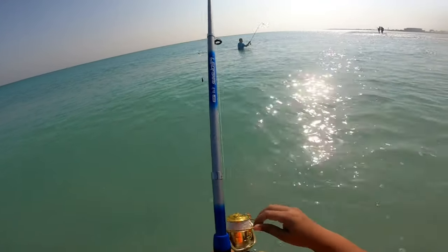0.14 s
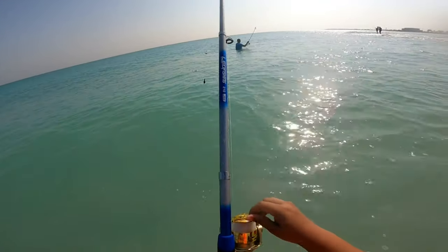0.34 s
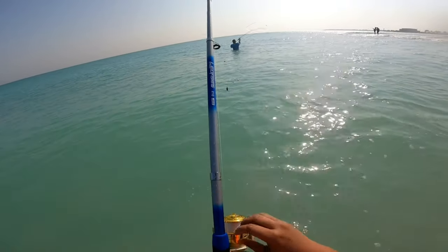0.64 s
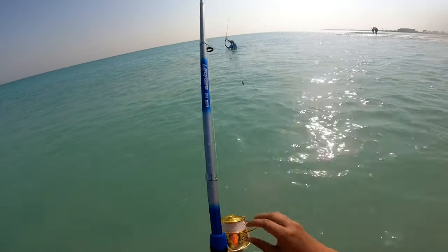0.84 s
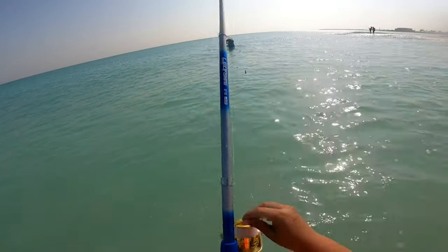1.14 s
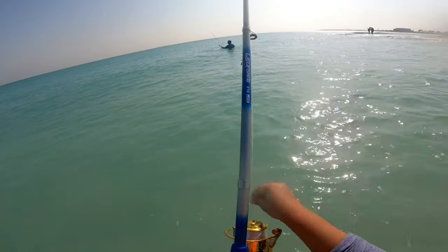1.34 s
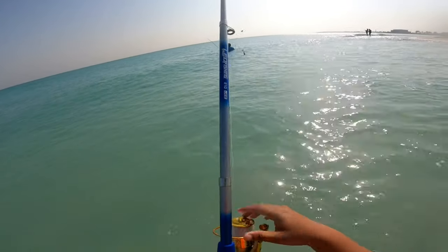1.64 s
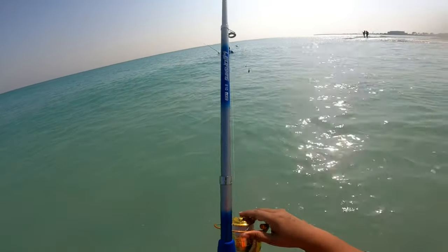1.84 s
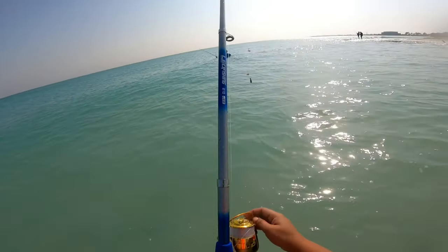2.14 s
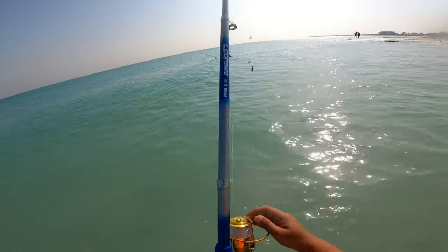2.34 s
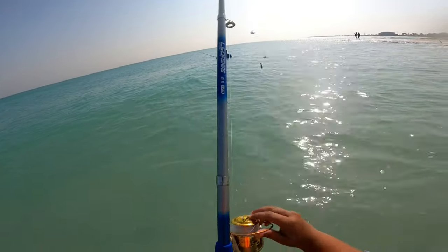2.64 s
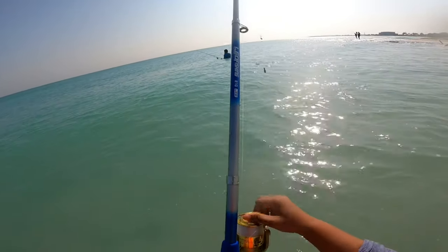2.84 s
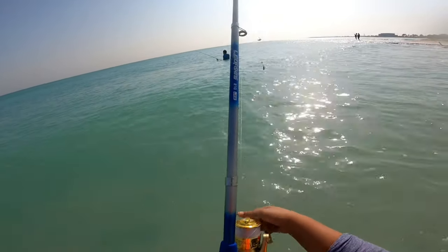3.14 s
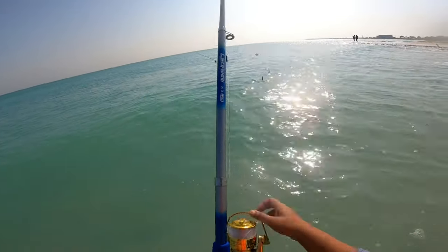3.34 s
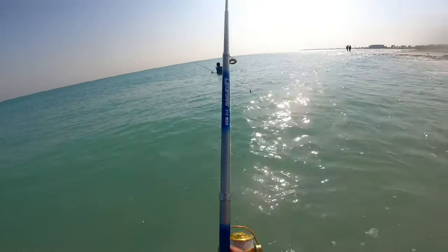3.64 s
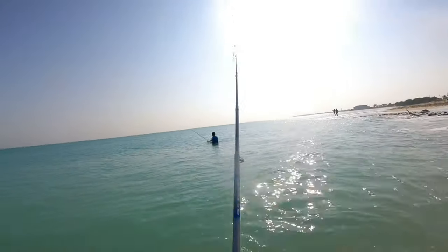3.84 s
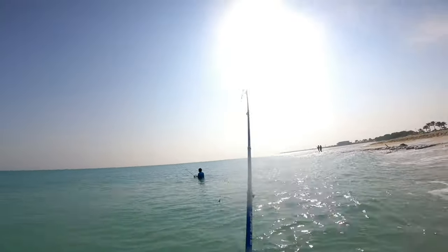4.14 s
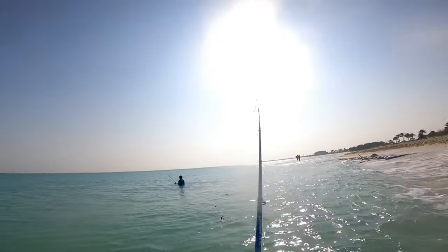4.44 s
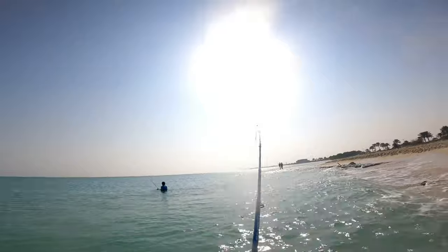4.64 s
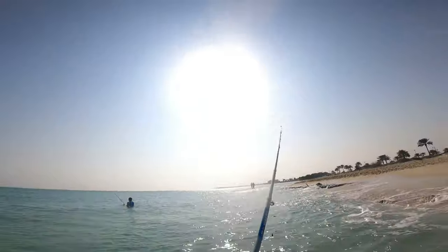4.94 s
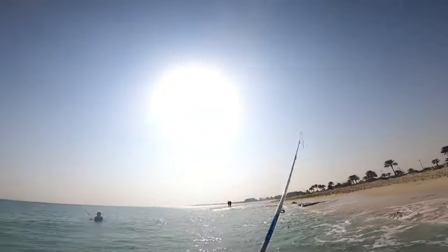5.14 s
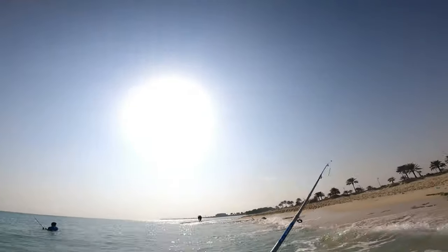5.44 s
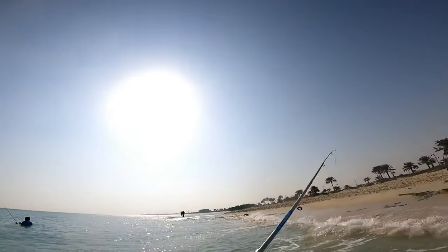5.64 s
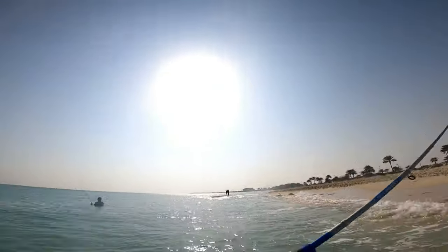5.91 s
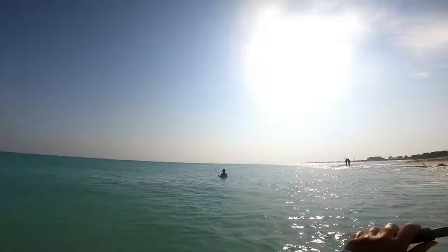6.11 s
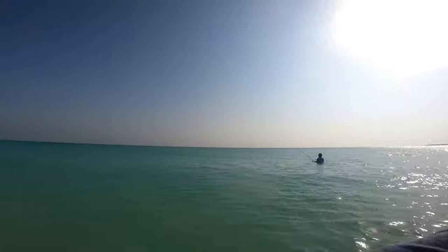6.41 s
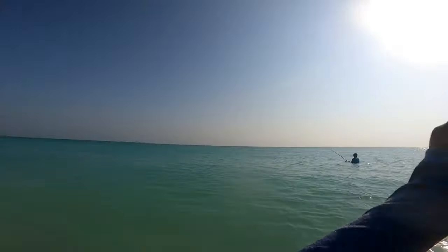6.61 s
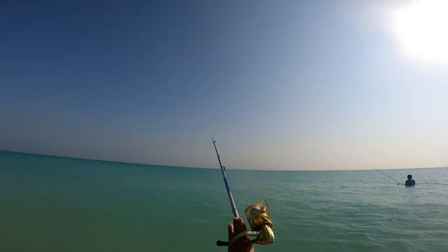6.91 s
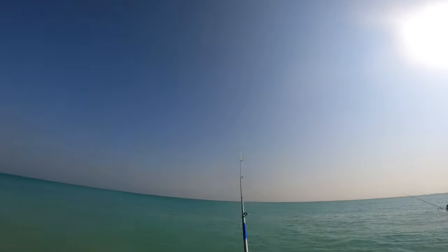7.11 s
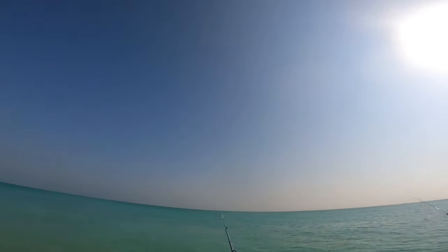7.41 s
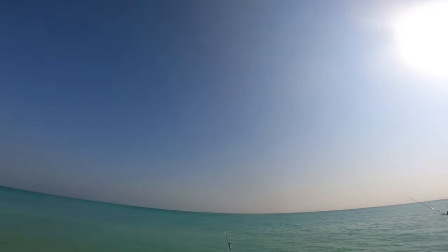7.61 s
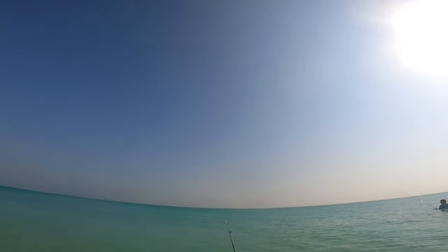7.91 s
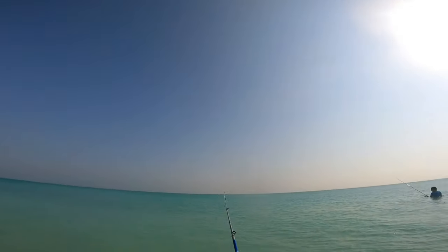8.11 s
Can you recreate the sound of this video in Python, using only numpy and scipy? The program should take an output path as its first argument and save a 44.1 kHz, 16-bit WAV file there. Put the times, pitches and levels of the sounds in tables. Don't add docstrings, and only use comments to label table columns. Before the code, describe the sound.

Close fishing reel clicks and one sharp metallic bail snap over lapping, bubbling surf and low wind rumble, then a rapid flutter of line ticks.

```python
import sys
import numpy as np
from scipy import signal
from scipy.fft import rfft, irfft, next_fast_len
from scipy.io import wavfile

SR = 44100
rng = np.random.default_rng(int(sys.argv[2]) if len(sys.argv) > 2 else 0)


def volts_from_decibels(level):
    exponent = np.asarray(level, float) / 20
    return 10 ** exponent


def wrap_up_sound(samples):
    columns = np.atleast_2d(samples).T
    tamed = np.clip(columns, -1, 1)
    steps = np.round(tamed * 32767).astype(np.int16)
    wavfile.write(sys.argv[1], SR, steps)


N = 364707


def rms_one(x):
    return x / np.sqrt(np.mean(x ** 2) + 1e-20)


def butter(x, order, hz, kind="low"):
    return signal.sosfilt(signal.butter(order, hz, kind, fs=SR, output="sos"), x)


def in_time(rows, silent=None):
    s, *columns = np.transpose(rows)
    return [np.interp(np.arange(N) / SR, s, c, silent, silent) for c in columns]


def at_hz(points, hz, outside=None):
    table = np.array(points)
    return np.interp(np.log(hz), np.log(table[:, 0]), table[:, 1], outside, outside)


def swells(rows, rise_s, fall_s):
    t = np.arange(N) / SR
    power = 0
    for s, db in rows:
        power = power + volts_from_decibels(2 * db) * np.exp(-((t - s) / np.where(t < s, rise_s, fall_s)) ** 2)
    return np.sqrt(power)


def strokes(starts, lengths, levels_db, edge):
    t = np.arange(N) / SR
    gain = 0
    for s, length, db in zip(starts, lengths, levels_db):
        outside_s = np.maximum(np.maximum(s - t, t - s - length), 0)
        gain = gain + volts_from_decibels(db - 20 * outside_s / (edge * length + 0.0093))
    return gain


def drift(rate):
    r = np.exp(-80 * np.pi * rate / SR)
    slow = signal.lfilter([1], [1, -2 * r, r * r], rng.standard_normal(N // 40 + 2002))[2000:]
    return np.interp(np.arange(N) / 40, np.arange(len(slow)), rms_one(slow))


def ring(clicks, hz, t60):
    r, w = volts_from_decibels(-60 / (t60 * SR)), 2 * np.pi * hz / SR
    return signal.lfilter([0, np.sin(w)], [1, -2 * r * np.cos(w), r * r], clicks + 1e-18)


# (frequency [Hz], side relative to mid [dB])
WIDTH = [(30, -24), (150, -24.5), (400, -17.5), (900, -16.5), (1500, -23.5), (2500, -26.5), (5000, -12),
         (9000, 5)]


def turbulence(spectrum, shared_db, own_db, rate, grain_db=0.):
    size = next_fast_len(N)
    hz = np.maximum(np.arange(size // 2 + 1) * SR / size, 1)
    grains = rng.standard_normal((2, size)) * volts_from_decibels(grain_db * np.minimum(rng.exponential(1, size), 6))
    mid, side = rfft(grains) * volts_from_decibels(at_hz(spectrum, hz, -200))
    side = side * volts_from_decibels(at_hz(WIDTH, hz))
    lowest_hz, highest_hz = spectrum[0][0], spectrum[-1][0]
    octave = np.log2(hz / lowest_hz)
    out, together = 0, shared_db * drift(rate)
    for centre in np.arange(0, np.log2(highest_hz / lowest_hz) + .5, .5):
        share = np.clip(1 - 2 * np.abs(octave - centre), 0, 1)
        band = irfft(np.array([mid + side, mid - side]) * share, size)[:, :N]
        out = out + band * volts_from_decibels(together + own_db * drift(rate))
    return rms_one(out)


CALM_DB = -46

# (time [s], level [dB])
BREEZE = [(0, -27.5), (.2, -37.5), (.55, -33), (.9, -44), (1.22, -36), (1.45, -50.5), (1.92, -43.5),
          (2.6, -44), (3.3, -39), (4.5, -49), (5.0, -33.5), (5.3, -34), (5.62, -35), (5.9, -41),
          (6.95, -46), (7.17, -33), (7.45, -43.5), (8.27, -44.5)]
# (time [s], level [dB])
PUFFS = [(.0, -35), (.3, -36.5), (.53, -35), (1.15, -45.5), (1.24, -50), (2.14, -55), (2.45, -42),
         (2.7, -36), (2.92, -36.5), (3.13, -32.5), (3.42, -32), (4.0, -46), (4.98, -53), (5.15, -28.5),
         (5.32, -32.5), (5.57, -30), (5.75, -35), (6.15, -37), (6.77, -43), (7.2, -58), (7.93, -48.5)]
# (time [s], level [dB])
THUDS = [(.05, -39), (.38, -39), (2.3, -43), (2.77, -35.5), (3.9, -37), (4.33, -41), (5.13, -30),
         (5.46, -35), (5.62, -27), (5.53, -34), (5.72, -33), (4.2, -41), (4.5, -42), (6.45, -43),
         (3.3, -36), (6.9, -42), (7.96, -35.5)]
# (frequency [Hz], level per Hz [dB])
RUMBLE = [(12, -31.5), (22, 4), (32, 4.5), (45, 4.5), (72, 5.5), (100, -3), (150, -31), (240, -95)]
# (frequency [Hz], level per Hz [dB])
BUFFET = [(35, -30.5), (65, -10), (108, 5), (280, -8), (360, -21.5), (620, -120)]
# (time [s], wash level [dB], extra fizz [dB], extra tumble [dB])
SURGE = [(0, -36, -3, -1), (.35, -41.5, -1.5, 0.5), (0.851, -46, 1, 3), (1.7, -48, 2.5, -0.5),
         (2.8, -47.5, 2.5, 4.5), (3.099, -40, -1, 2), (3.43, -39, -2, 4), (3.6, -43, -2.5, 3),
         (4.3, -46.5, 2, 1), (4.9, -43.5, 0.5, 0.5), (5.3, -37.5, 2.5, 0), (5.48, -34, 1.5, -0.5),
         (5.92, -35.5, 4, 4.5), (6.3, -40.5, 1, 1.5), (6.6, -46.5, -1, 0), (6.95, -45.5, -0.5, 1),
         (7.3, -42, 0, -5), (8.27, -47, -2, 4)]


def breeze():
    gust_db, = in_time(BREEZE)
    lead_s = 0.16
    ahead_db = in_time([(s - lead_s, db) for s, db, *rest in SURGE])[0] - CALM_DB
    swell_db = -51.5 + 1.16 * ahead_db
    puffs = swells(PUFFS, rise_s=.049, fall_s=.047)
    boom = np.sqrt(volts_from_decibels(2 * (gust_db - 3.5)) + volts_from_decibels(2 * swell_db) + puffs ** 2)
    press = np.hypot(volts_from_decibels(gust_db), swells(THUDS, rise_s=.035, fall_s=.035))
    rumble = press * turbulence(RUMBLE, shared_db=-1.0, own_db=1.0, rate=10.0)
    return rumble + boom * turbulence(BUFFET, shared_db=1.5, own_db=1.5, rate=23.0)


def bubbles(per_s, cycles):
    sizes = volts_from_decibels(6.2 * np.minimum(rng.exponential(1, N), 3.8)) * rng.choice([-1, 1], N)
    born = rng.random(N) < per_s / SR
    pitches, dealt = np.geomspace(330, 1950, 18), rng.integers(0, 18, N)
    out = 0
    for k, hz in enumerate(pitches):
        out = out + ring(sizes * born * (dealt == k), hz, cycles / hz) * (300 / hz)
    return rms_one(out)


# (time [s], lift [dB])
CRESTS = [(2.33, 2), (2.95, 0), (4.5, 1), (5.0, 0.5), (5.4, 1.5), (5.64, 0), (5.92, 2.5), (2.55, 0.5),
          (6.55, 0.5), (.6, -1), (3.95, -0.5), (6.151, -1), (6.85, 1.5), (7.65, 1)]
# (time [s], level [dB])
SLUMPS = [(.1, -50), (.92, -46), (2.37, -39.5), (3.3, -36.5), (3.43, -36), (3.69, -38), (5.02, -56),
          (5.56, -31.5), (5.64, -25.5), (5.78, -26.5), (5.89, -29), (6.05, -44), (6.15, -35), (6.28, -46),
          (6.75, -41.5), (7.25, -45), (7.97, -40)]
# (frequency [Hz], level per Hz [dB])
TUMBLE = [(100, -7.5), (170, 2.5), (354, 1.5), (456, -3), (520, -4), (750, -12.5), (980, -28.5),
          (1650, -120)]
# (frequency [Hz], level per Hz [dB])
WASH = [(280, -27), (480, -7), (518, -5), (759, -4.5), (870, -3.5), (1220, -5.5), (1440, -15.5),
        (1600, -12), (2080, -34), (3520, -120)]
# (frequency [Hz], level per Hz [dB])
FOAM = [(900, -30.5), (1300, 0.5), (1440, -4.5), (1750, 1.5), (2360, -2), (2640, -6), (2870, -4.5),
        (3400, -10.5), (4200, -37), (5500, -68.5)]
# (frequency [Hz], level per Hz [dB])
SPRAY = [(2600, -29.5), (3500, -2), (3900, -1), (4400, -1), (5400, -11.5), (6500, -17.5), (7500, -25.5),
         (9000, -37.5), (11000, -54)]


def sea():
    t = np.arange(N) / SR
    wash_db, froth_db, weight_db = in_time(SURGE)
    for s, lift_db in CRESTS:
        wash_db = wash_db + lift_db * np.exp(-((t - s) / 0.058) ** 2)
    vigour_db = wash_db - CALM_DB
    tumble_db = -43.5 + 0.9 * vigour_db + weight_db
    foam_db = -55.5 + 1.227 * vigour_db + 0.74 * froth_db
    spray_db = -70 + 1.196 * vigour_db + froth_db
    lumps = np.hypot(volts_from_decibels(tumble_db), swells(SLUMPS, rise_s=.03, fall_s=.053))
    tumble = lumps * turbulence(TUMBLE, shared_db=.5, own_db=2.0, rate=15.0)
    wash = volts_from_decibels(wash_db) * turbulence(WASH, shared_db=0.25, own_db=1.87, rate=24.0, grain_db=1.5)
    foam = volts_from_decibels(foam_db) * turbulence(FOAM, shared_db=0.96, own_db=-0.4, rate=48.0, grain_db=2.5)
    spray = volts_from_decibels(spray_db) * turbulence(SPRAY, shared_db=0.65, own_db=1.5, rate=29.0, grain_db=2.0)
    trapped_air = volts_from_decibels(wash_db - 4.5) * butter(bubbles(400., cycles=36.), 2, 3000)
    return tumble + wash + foam + spray + trapped_air


def ticks(table, t60, crack_db, top_hz, low_hz=2200, frame_db=-10):
    span = 2000
    out, age = np.zeros(N + span), np.arange(span) / SR
    for (s, peak_db, hz), noise in zip(table, rng.standard_normal((len(table), span))):
        frame_hz = 4300 * (1 + .04 * noise[1])
        frame = volts_from_decibels(frame_db + 3.0 * noise[0]) * np.sin(2 * np.pi * frame_hz * age)
        tone = (np.sin(2 * np.pi * hz * age) + frame) * volts_from_decibels(-60 * age / t60)
        crack = volts_from_decibels(crack_db) * noise * volts_from_decibels(-60 * age / 0.0035)
        start = round(s * SR)
        out[start:start + span] += volts_from_decibels(peak_db) * (tone + crack) * (1 - np.exp(-age / 0.00021))
    return butter(butter(out[:N], 6, top_hz), 3, low_hz, "high")


# (time [s], peak level [dB], pitch [Hz])
DRIPS = [(.1555, -50, 3070), (0.8061, -48, 4470), (2.288, -64, 6430), (2.3077, -50, 3290),
         (2.6994, -61, 6470), (2.73, -57, 7140), (3.2863, -54, 5930), (3.985, -53, 2600),
         (4.1579, -60, 3230), (4.4662, -66, 4570), (4.5481, -59, 3120), (4.7187, -65, 3010),
         (4.7541, -64, 3140), (5.3368, -56, 3030), (.216, -44, 2300), (5.26, -59, 4500), (5.635, -47, 2300),
         (5.7, -48, 3500), (5.955, -49, 2600), (6.02, -49, 4800)]


def drips():
    return ticks(DRIPS, t60=.0068, crack_db=5.8, top_hz=7500, low_hz=1500)


# (time [s], peak level [dB], pitch [Hz])
PAWL = [(1.0286, -44, 3490), (1.0385, -40, 3740), (1.0809, -37, 3450), (1.1014, -44, 4500),
        (1.1124, -46, 4070), (1.1235, -40, 2800), (1.128, -43, 4150), (1.1207, -40, 4180),
        (1.1434, -43, 4400), (1.1504, -45, 4400), (1.1584, -44, 4500), (1.1405, -43, 3200),
        (1.134, -47, 4300), (1.1865, -49, 3000), (1.2005, -47, 3100), (1.172, -36, 2900),
        (1.1745, -43, 4300), (1.211, -46, 2900), (1.1945, -38, 3300), (1.2166, -46, 3000),
        (1.226, -41, 3200), (1.231, -44, 3000), (1.2354, -44, 3260), (1.2521, -48, 3400),
        (1.2874, -48, 4560), (1.296, -43, 4570)]


def pawl():
    return volts_from_decibels(-3.5) * ticks(PAWL, t60=.017, crack_db=6.7, top_hz=6000)


# (start [s], length [s], body level [dB], grit level [dB])
RUB = [(1.03, 0.041, -62, -81), (1.055, 0.009, -56, -65), (1.094, 0.043, -59, -70), (1.143, 0.05, -57, -78),
       (1.205, 0.035, -61, -76), (1.254, 0.061, -60, -73.5), (7.04, 0.018, -71, -76),
       (7.14, 0.043, -70, -68), (7.222, .025, -70, -78), (7.05, 0.05, -58, -67), (7.098, 0.038, -54, -69),
       (7.194, 0.024, -53, -71), (7.24, 0.059, -63, -69), (7.334, 0.062, -59.5, -67.5),
       (7.403, .04, -62, -74), (7.473, 0.012, -53, -77), (7.558, 0.19, -77, -79), (7.76, .03, -69, -78),
       (7.85, 0.071, -79, -80), (8.046, 0.12, -75, -79)]
# (frequency [Hz], level per Hz [dB])
RUB_COLOUR = [(1800, -37), (2400, 4), (2800, -6), (3180, 4), (3600, -9.5), (4290, -5.5), (5000, -13),
              (6200, -37), (7500, -61)]
# (frequency [Hz], level per Hz [dB])
GRIT_COLOUR = [(4000, -33), (5500, -4.5), (7000, -9), (8500, -12), (9500, -16), (11000, -63)]


def rubbing():
    starts, lengths, body_db, grit_db = np.transpose(RUB)
    body = turbulence(RUB_COLOUR, shared_db=2.0, own_db=2.5, rate=29.0, grain_db=2.5)
    grit = turbulence(GRIT_COLOUR, shared_db=-3.0, own_db=-1.0, rate=21.0, grain_db=5.5)
    return strokes(starts, lengths, body_db, .38) * body + strokes(starts, lengths, grit_db, .38) * grit


# (time [s], crack level [dB], pitch [Hz], ring level [dB])
SHARP = [(1.059, -43, 7000, -44), (1.0595, -60, 9500, -58), (1.0642, -56, 7000, -56),
         (1.0695, -59, 9800, -67), (1.287, -66, 8200, -64), (1.2965, -65, 8600, -65),
         (7.2765, -61, 6500, -62), (7.281, -58, 7500, -64), (7.364, -53, 6800, -62),
         (7.371, -58, 7400, -62), (6.8857, -55, 4950, -44), (6.888, -50, 3400, -39.5)]


def bright_ticks():
    span = 900
    out, age = np.zeros(N), np.arange(span) / SR
    for s, db, hz, ring_db in SHARP:
        crack = volts_from_decibels(db) * signal.lfilter([.5, .5], [1, -.3], rng.standard_normal(span))
        tone = volts_from_decibels(ring_db) * np.sin(2 * np.pi * hz * age)
        envelope = volts_from_decibels(-60 * age / 0.014) * (1 - np.exp(-age / 0.00037))
        start = round(s * SR)
        out[start:start + span] += (crack + tone) * envelope
    return butter(out, 2, [1700, 10000], "band")


# (time [s], peak level [dB])
SNAP = [(1.56, -40), (1.5629, -24), (1.564, -15), (1.567, -31), (1.567, -32), (1.5687, -31), (1.57, -29),
        (1.573, -23), (1.5714, -24), (1.575, -26), (1.577, -33)]
# (frequency [Hz], level [dB], decay time t60 [s])
BAIL = [(480, -8, .02), (820, -10, 0.008), (1210, -10, 0.0057), (1410, 0.5, 0.013), (2070, -3, 0.0046),
        (2370, -12, 0.0067), (3140, 3, 0.002), (3500, -9, 0.0079), (4210, -10.5, 0.019),
        (4660, -15.5, 0.028), (5400, -15, 0.0055), (7200, -19, 0.0027), (9100, -13.5, 0.004),
        (14300, -19, .002)]
# (time [s], level [dB])
SHIVER = [
    (1.575, -62),
    (1.60, -67),
    (1.65, -67),
    (1.68, -80),
]


def bail_snap():
    at, bounce_db = [round(s * SR) for s, db in SNAP], np.array(SNAP)[:, 1]
    out = np.zeros(N)
    chance = rng.standard_normal((len(SNAP), len(BAIL)))
    for (hz, level_db, t60), own in zip(BAIL, chance.T):
        sign = np.sign(np.sin(40 * own)) if hz > 1600 else 1
        clicks = np.zeros(N)
        clicks[at] = volts_from_decibels(bounce_db + level_db - 6.0 + 2.0 * own) * sign
        out += ring(clicks, hz, t60)
    bounces = np.zeros(N)
    bounces[at] = volts_from_decibels(bounce_db - 13)
    rattle = signal.lfilter([1], [1, -volts_from_decibels(-60 / (.009 * SR))], bounces + 1e-18) * rng.standard_normal(N)
    out = out + butter(rattle, 2, [2300, 5500], "band")
    buzz = rms_one(ring(ring(rng.standard_normal(N), 4700, .004), 4800, .004))
    out = butter(out, 1, 7000)
    return out + volts_from_decibels(in_time(SHIVER, -200)[0]) * buzz


# (start [s], length [s], level [dB])
LINE_HISS = [(3.09, .2, -90), (3.15, .03, -83), (3.55, 0.19, -90.5), (3.73, .06, -90), (4.15, .2, -92),
             (4.22, .03, -93), (6.335, 0.32, -84), (6.72, 0.29, -87.5), (6.885, 0.014, -73),
             (7.05, .09, -82), (7.256, 0.57, -79.5), (7.897, 0.34, -85.5), (8.262, .02, -83)]


def line_hiss():
    level = strokes(*np.transpose(LINE_HISS), edge=.2)
    hiss = rms_one(butter(rng.standard_normal(N), 8, [12100, 14500], "band"))
    return level * hiss * volts_from_decibels(1.2 * drift(9.0)) * volts_from_decibels([[6.1], [-22]])


# (time [s], peak level [dB], pitch [Hz])
SPOOL = [(6.8248, -41, 3120), (6.8457, -53, 4400), (6.9679, -49, 2850), (7.059, -39, 4300),
         (7.081, -41, 4200), (7.101, -34, 2900), (7.113, -38, 3100), (7.128, -30, 2960), (7.133, -43, 3900),
         (7.1904, -43, 3170), (7.197, -31, 2480), (7.203, -38, 3200), (7.21, -38, 3200), (7.295, -49, 3200),
         (7.341, -40, 4300), (7.355, -39, 3100), (7.363, -39, 3150), (7.371, -36, 3150), (7.381, -43, 3150),
         (7.4474, -46, 2840), (7.5192, -47, 2980), (7.5666, -49, 3130), (7.602, -49, 2830),
         (7.645, -48, 3100), (7.765, -49, 3100), (7.8085, -51, 2600), (7.9048, -49, 2900),
         (7.9218, -50, 3210), (8.05, -49, 3100), (8.1912, -50, 2980), (6.8858, -35, 2800),
         (6.9939, -43, 3030), (7.0338, -41, 4220), (7.0533, -40, 4300), (7.0672, -30, 3280),
         (7.0755, -27, 3060), (7.095, -29, 3270), (7.107, -30, 3070), (7.1205, -26, 2870),
         (7.1865, -40, 3220), (7.2383, -42, 2720), (7.2613, -47, 3050), (7.277, -34.5, 2950),
         (7.3147, -45, 3180), (7.3311, -35, 3140), (7.3475, -32, 3120), (7.399, -38, 3090),
         (7.4294, -46, 3210), (7.4638, -42, 3250), (7.4828, -34, 2940), (7.581, -40, 3220),
         (7.678, -33, 2960), (7.695, -36, 2900), (7.7803, -41, 2600), (7.8609, -46, 4400),
         (7.868, -47, 4400), (8.0798, -40, 3030), (8.1393, -43, 2930), (8.2545, -39, 2600)]


def spool():
    slows_s = 7.5
    fast = [row for row in SPOOL if row[0] < slows_s]
    slow = [row for row in SPOOL if row[0] >= slows_s]
    slaps = ticks(fast, t60=.0063, crack_db=-5.5, top_hz=5500)
    dull = ticks(slow, t60=.0077, crack_db=3.0, top_hz=4900, low_hz=1500, frame_db=-11.0)
    return slaps + volts_from_decibels(-3.0) * dull


def cover(x):
    x = butter(x, 3, [10600, 12600], "bandstop")
    return signal.sosfilt(signal.cheby2(10, 60, 15600, fs=SR, output="sos"), x)


def scene():
    around = breeze() + sea() + rubbing() + line_hiss()
    reel = drips() + pawl() + bright_ticks() + bail_snap() + spool()
    return around + cover(reel) * volts_from_decibels([[.3], [-.3]])


# (time [s], opening [0-1])
SIDE_OPENING = [
    (0, 0),
    (1.1, 0),
    (1.4, .3),
    (1.95, .05),
    (5.2, 0),
    (5.4, .22),
    (6.95, .55),
    (7.12, 0),
    (7.25, .95),
]


def thinned_lines(x):
    frames, lead = dict(fs=SR, window="cosine", nperseg=2048, noverlap=1024), 191
    x = np.pad(x, ((0, 0), (lead, 0)))
    hz, s, (mid, side) = signal.stft(np.array([x[0] + x[1], x[0] - x[1]]) / 2, **frames)
    patch = (np.sqrt(hz) / 3).astype(int)
    shape = (patch.max() + 1, len(s))
    whim, luck = rng.standard_normal(shape)[patch], rng.random(shape)[patch]
    hz_column = hz[:, None]

    body = np.abs(mid[(hz > 200) & (hz < 2500)]).mean(axis=0)
    jitter_db = 3.5 * (0.6 * rng.standard_normal(len(s)) + 0.8 * whim)
    floor = body * (body / body.mean()) ** .2 * volts_from_decibels(-39.5 + jitter_db)
    rise_db = np.clip(6 * (hz_column / 1000 - 7.2), 0, 9)
    floor = floor * volts_from_decibels(rise_db * (hz_column < 11500) * (1 + whim / 2))
    attack = np.abs(mid[(hz > 7000) & (hz < 10000)]).mean(axis=0) > body * volts_from_decibels(-26)
    heard = (np.abs(mid) > floor) | (hz_column < 5000) | attack

    low = .09 + .6 * np.interp(s, *np.transpose(SIDE_OPENING))
    share = np.where(hz_column < 2600, low, low + .42)
    kept = (.6 * rng.random(len(s)) + .4 * luck < share) & (np.abs(side) > floor * volts_from_decibels(-7.5))
    kept = kept | (hz_column > 11500)
    mid, side = signal.istft(np.array([mid * heard, side * heard * kept]), **frames)[1][:, lead:lead + N]
    return np.array([mid + side, mid - side])


def top_cut(x):
    return signal.sosfilt(signal.butter(12, 15350, fs=SR, output="sos"), x)


def record(dry):
    rounded = .4 * np.tanh(dry / .4)
    faded_in = rounded * np.minimum(np.arange(N) / 90, 1)
    mix = thinned_lines(faded_in)
    return top_cut(mix)


dry = scene()
out = record(dry)
wrap_up_sound(out)
```